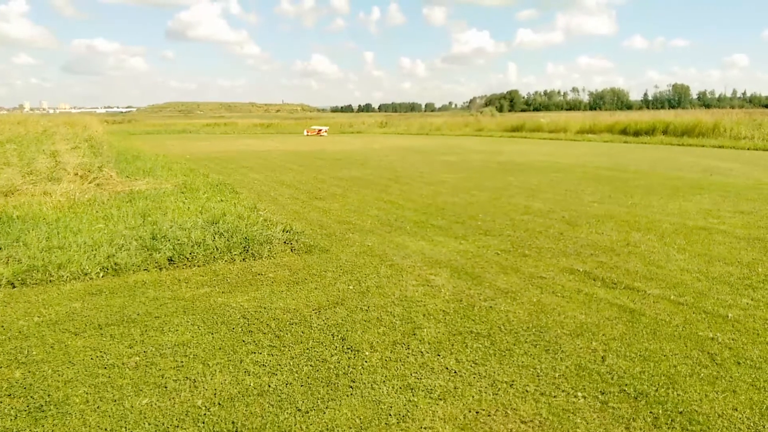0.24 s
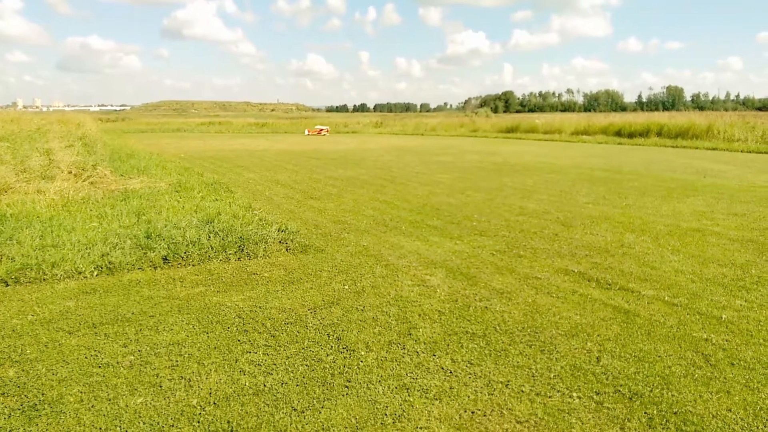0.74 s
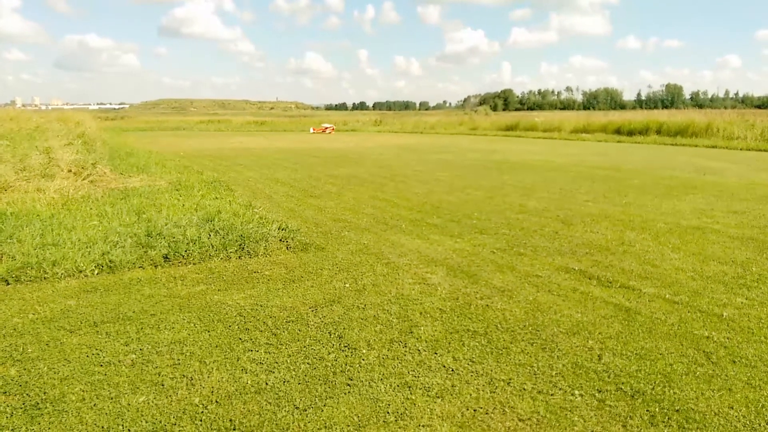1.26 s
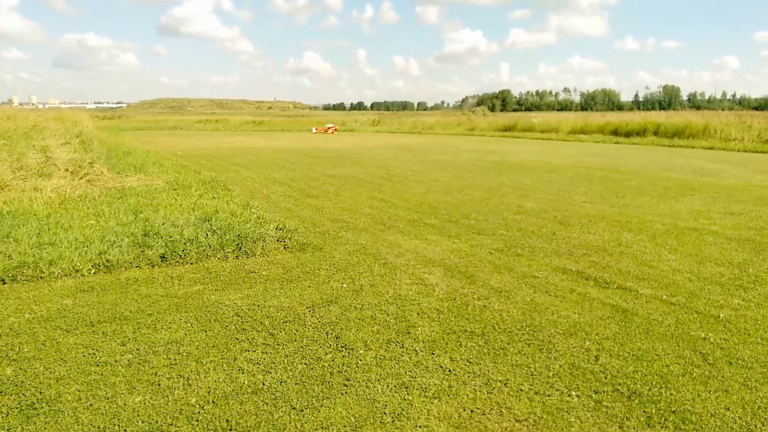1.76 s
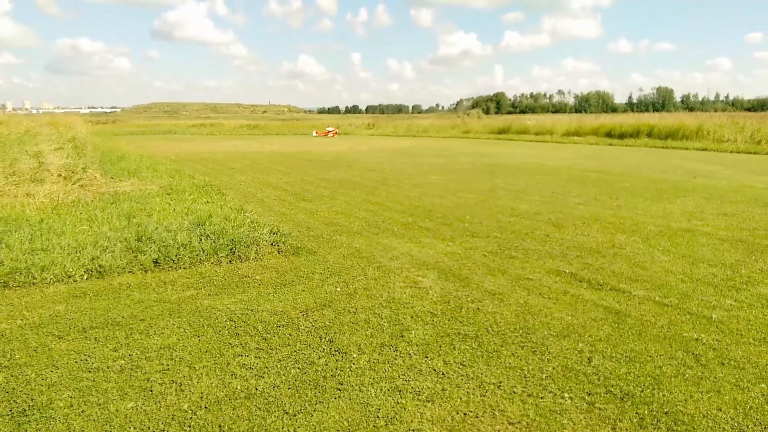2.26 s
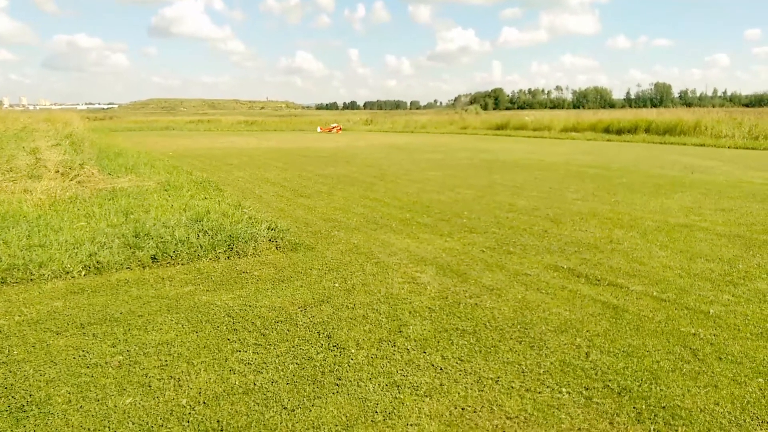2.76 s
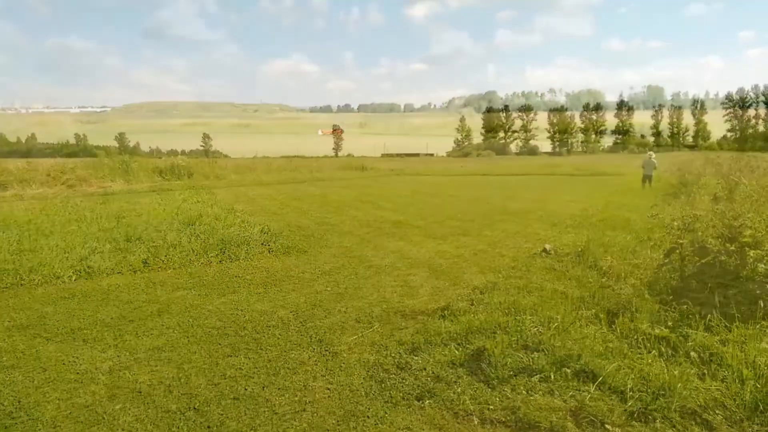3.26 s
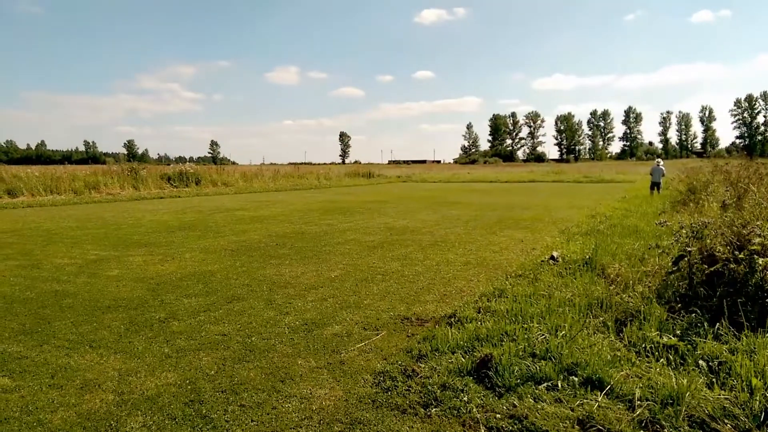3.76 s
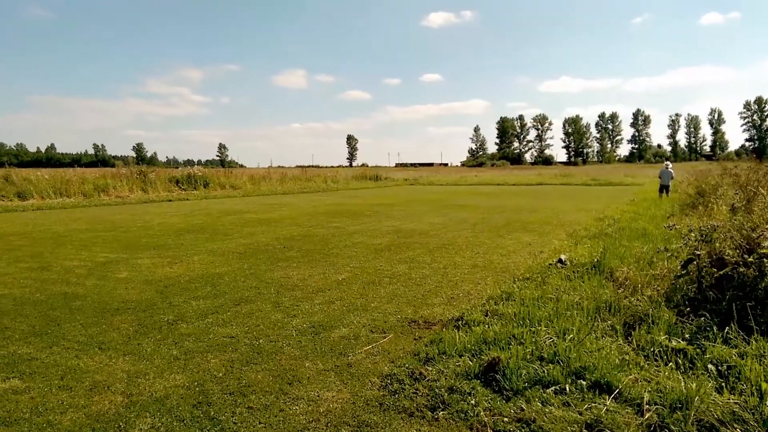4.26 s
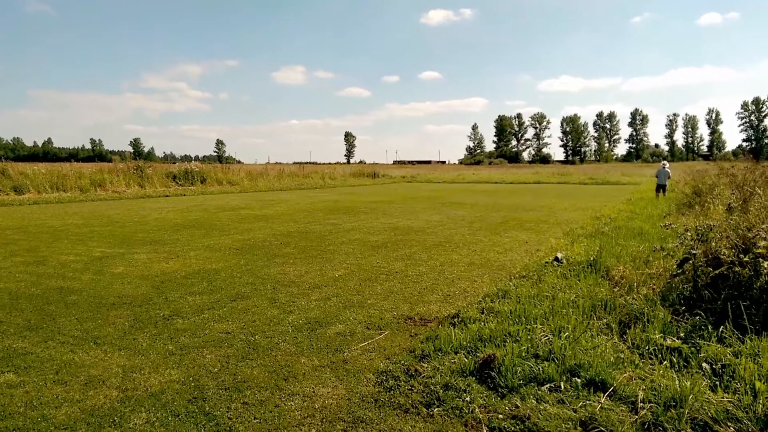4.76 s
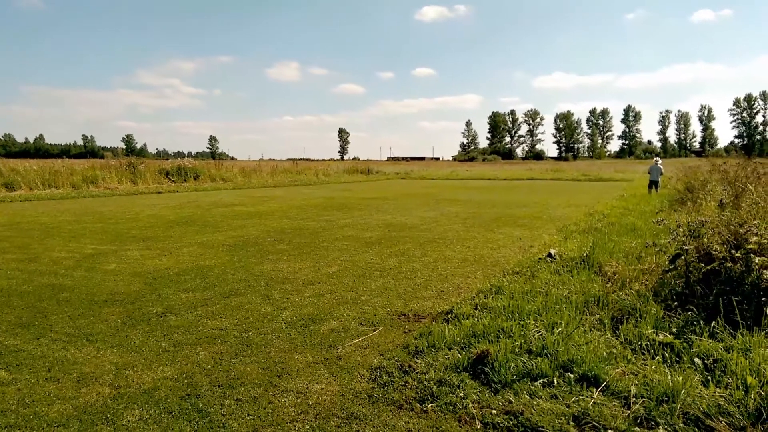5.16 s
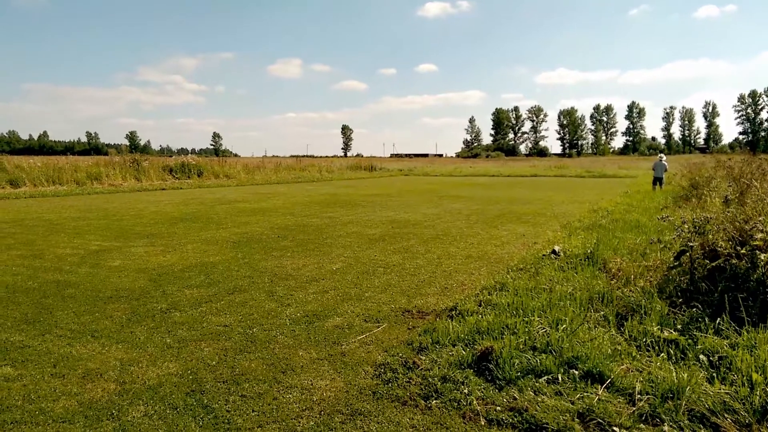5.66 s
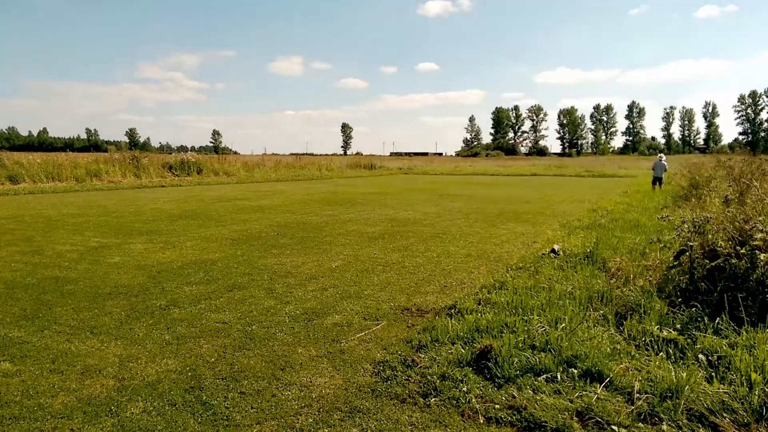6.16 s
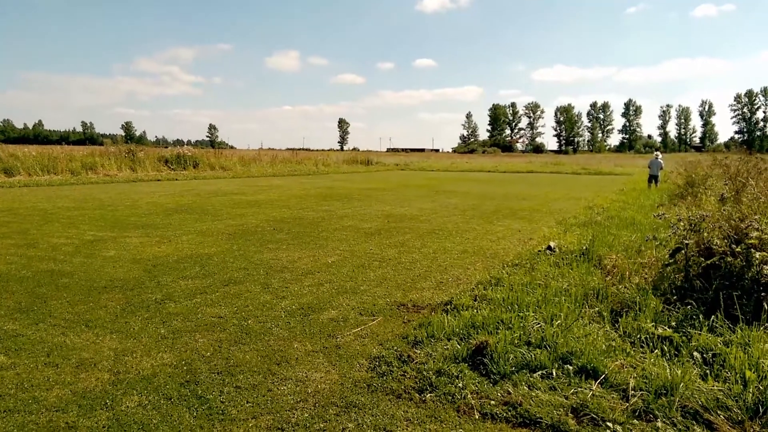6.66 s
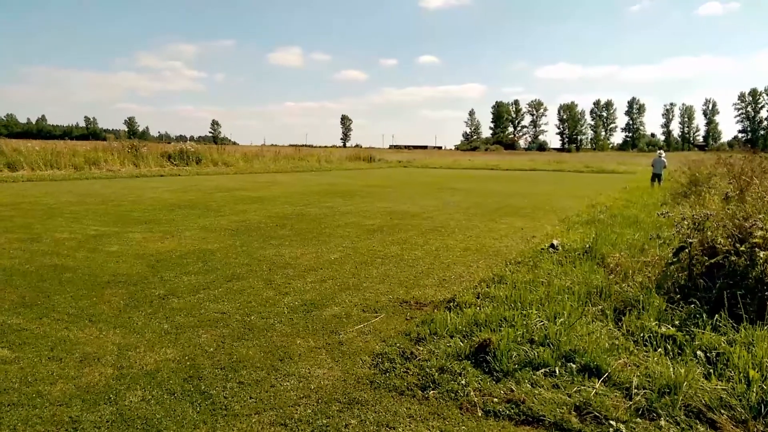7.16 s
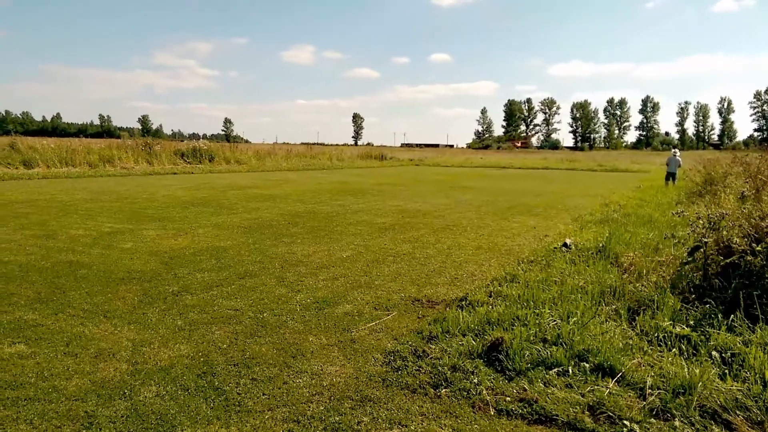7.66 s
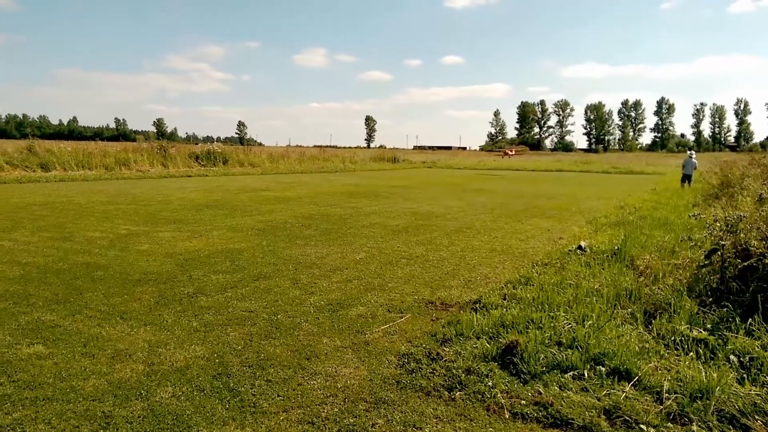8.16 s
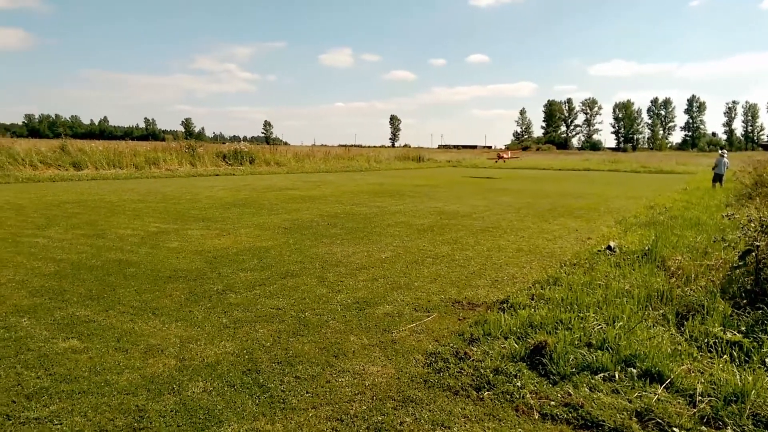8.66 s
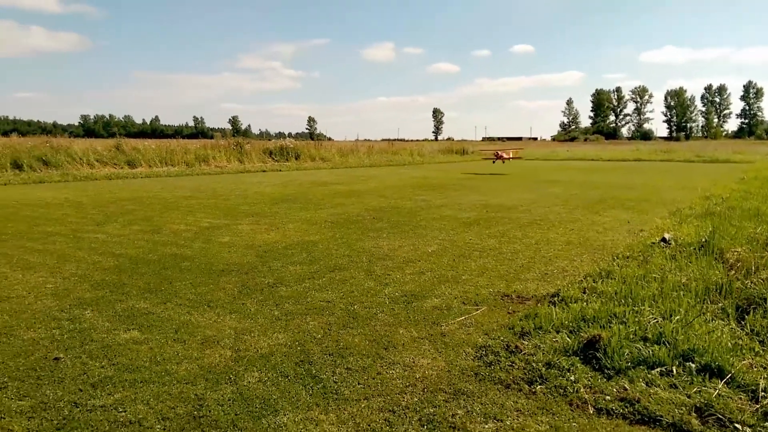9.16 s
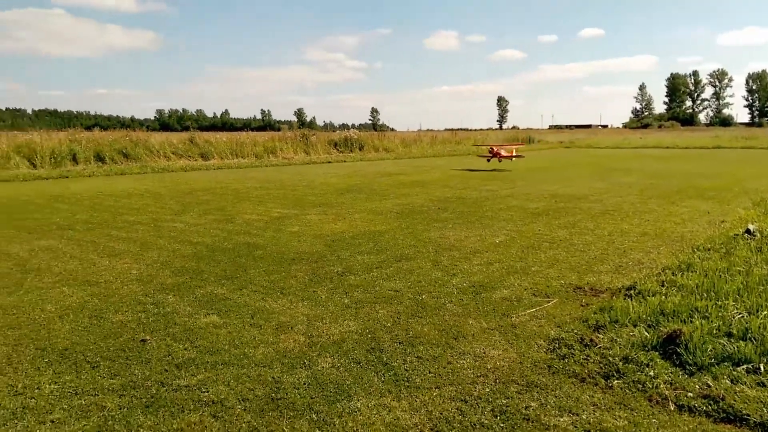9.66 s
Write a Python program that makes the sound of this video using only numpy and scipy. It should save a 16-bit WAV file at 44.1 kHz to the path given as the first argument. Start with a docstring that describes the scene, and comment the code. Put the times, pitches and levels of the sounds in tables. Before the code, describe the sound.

Outdoor stereo sound with wind buffeting at first, mostly on the right. A far engine lopes with low soft putts, faint metallic ticks and airy propeller hiss, slowly quickening. Around three seconds it crossfades to a nearer, brighter engine, revved in cracking bursts, with a brief hollow bark at the top revs. It falls back to irregular pops and thumps at low throttle, swelling steadily as it approaches. Insects rasp faintly in the grass.

```python
"""A model biplane's three-cylinder four-stroke engine on a grass airfield, in two views that dissolve.
Far off it taxis with a dull uneven throb while wind bumps the right microphone; then, closer, the throttle
is blipped with sharp cracks and the plane rolls nearer at a stumbling idle. Gas pulses ring exhaust modes;
shaped noise makes the gas, propeller hiss, wind, air and the insects in the grass; a bird chip is a falling sine."""
import sys
import numpy as np
from scipy import signal
from scipy.fft import rfft, irfft
from scipy.io import wavfile

SR = 44100
rng = np.random.default_rng(int(sys.argv[2]) if len(sys.argv) > 2 else 0)


def inscribe(sig):
    """Save sig as 16-bit PCM at rate SR to the path in sys.argv[1].

    A 1-D sig is mono; a 2-D sig holds one channel per row.
    Samples are clipped to [-1, 1] before scaling.
    """
    pcm = np.round(np.clip(np.atleast_2d(sig).T, -1, 1) * 32767)
    wavfile.write(sys.argv[1], SR, pcm.astype(np.int16))


N = 437472
T = np.arange(N) / SR


def amp(db):
    """Amplitude factor of a level in dB."""
    return 10 ** (np.asarray(db) / 20)


def unit(x):
    """Scales a sound to an RMS of 1."""
    return x / np.sqrt(np.mean(x ** 2) + 1e-20)


def curve(rows, axis=1):
    """One column of a table, joined by straight lines in time."""
    rows = np.asarray(rows)
    return np.interp(T, rows[:, 0], rows[:, axis])


def phase_of(hz):
    """Running phase in radians of a frequency that may vary."""
    return 2 * np.pi * np.cumsum(hz) / SR


def noise():
    """White noise of unit variance."""
    return rng.standard_normal(N)


def waver(hz):
    """Slow random drift of unit RMS: noise under a Gaussian low-pass."""
    lowpass = np.exp(-(np.fft.rfftfreq(N, 1 / SR) / hz) ** 2)
    return unit(irfft(rfft(noise()) * lowpass, N))


def colour(x, points):
    """Filters causally (minimum phase) to a spectrum given as f/Hz, level/dB."""
    hz, db = np.transpose(points)
    log_hz = np.log(abs(np.fft.fftfreq(4096, 1 / SR)) + 1)
    log_gain = np.log(amp(np.interp(log_hz, np.log(hz), db)))
    taps = np.fft.ifft(np.exp(np.conj(signal.hilbert(log_gain)))).real
    return signal.oaconvolve(x, taps)[:N]


def resonate(x, hz, width, phase=0):
    """A resonance of gain 1 whose frequency can follow a curve: shift to 0 Hz, smooth, shift back."""
    turn = np.exp(1j * phase_of(hz * np.ones(N)))
    r = np.exp(-np.pi * width / SR)
    smooth = signal.lfilter([1 - r], [1, -r], x / turn + 1e-18)
    return 2 * (np.exp(1j * phase) * turn * smooth).real


def clicks(s, db):
    """Impulses at the given times and levels."""
    place = np.clip(np.round(s * SR).astype(int), 0, N - 1)
    return np.bincount(place, amp(db), N)


def fade(x, seconds):
    """Gives each impulse an exponential tail."""
    return signal.lfilter([1], [1, -np.exp(-1 / (SR * seconds))], x + 1e-18)


def pan(x, lean_db):
    """Sets the level difference of the two microphones at constant power; positive leans left."""
    ports = np.array([x * amp(lean_db / 2), x * amp(-lean_db / 2)])
    return ports / np.cosh(lean_db * np.log(10) / 40)


# spectra of the open-field background at the left and right microphones: f/Hz, level/dB
AIR_LEFT = [(60, -44), (250, 13.5), (500, 16.5), (1000, 15.5), (2000, 0.5), (4000, 13), (7000, 0.5),
            (10000, -32), (16000, 3)]
AIR_RIGHT = [(60, -9), (250, -11), (500, -1.5), (1000, -4.5), (2000, -7), (4500, -32), (7000, -13),
             (9000, -7.5), (11000, -1.5), (16000, -6.5)]


def air():
    """Faint open-field wash and microphone hiss: steady noise, with more of the top on the right."""
    left = amp(-63.5) * unit(colour(noise(), AIR_LEFT))
    right = amp(-55.5) * unit(colour(noise(), AIR_RIGHT))
    return np.array([left, right])


# wind rumble over time, before a common trim: t/s, level/dB
WIND = [(0, -34.5), (.15, -41), (.8, -45), (2.9, -42), (4.2, -56), (6, -52.5), (6.5, -54.5), (8.8, -52.5),
        (9.92, -47.5)]
# its lean between the microphones: t/s, left minus right level/dB
WIND_LEAN = [(0, -9.5), (1.5, -4.5), (3, -6.5), (4, -2.5), (9.9, -1)]
# its spectrum: f/Hz, level/dB
RUMBLE = [(15, -19), (35, -4), (55, 2), (90, -5), (150, -3), (300, -12), (700, -37), (2000, -88)]
# gusts that bump the right microphone: t/s, level/dB, decay/s, upper edge f/Hz
BUMPS = [(0.003, -25.5, 0.016, 267), (0.036, -33.5, 0.015, 225), (.236, -31.5, 0.013, 150),
         (0.286, -25.5, 0.016, 190), (0.3, -30, 0.0074, 270), (0.575, -34, 0.02, 150),
         (0.612, -40, 0.011, 192), (0.76, -43.5, 0.059, 123), (1.238, -47, 0.23, 128),
         (1.9747, -26.5, 0.0012, 750), (1.98, -23, 0.011, 165), (2.024, -35.5, 0.022, 323),
         (2.079, -28, 0.0071, 187), (2.77, -42.5, 0.086, 120)]


def wind():
    """Lumpy rumble, partly shared by both microphones, and sudden bumps: a push of air, then eddies."""
    shared = noise()
    rumble = np.array([unit(colour(shared + 0.5 * noise(), RUMBLE)) for _ in range(2)])
    lumps_db = 2 * np.tanh(waver(hz=3.1))
    rumble *= pan(amp(curve(WIND) - 4.5 + lumps_db), lean_db=curve(WIND_LEAN))
    bumps = np.zeros(N)
    age = T[:SR // 3]
    for s, db, decay, edge_hz in BUMPS:
        shape = np.exp(-age / decay)
        push = signal.unit_impulse(len(age)) * np.sqrt(SR * decay / 2)
        eddies = shape * rng.standard_normal(len(age))
        band = signal.butter(4, [45, edge_hz], "band", fs=SR, output="sos")
        puff = signal.sosfilt(band, eddies - push)
        start = max(round(s * SR), 0)
        bumps[start:start + len(age)] += amp(db) * puff * np.linalg.norm(shape) / np.linalg.norm(puff)
    return rumble + pan(bumps, lean_db=-37)


def wingbeat(rate, depth_db, double_db):
    """The pulsing of an insect's rasp, one stroke per cycle."""
    angle = phase_of(rate)
    return unit(amp(depth_db * np.cos(angle) + double_db * np.cos(2 * angle)))


# spectrum of the endless bush-cricket trill: f/Hz, level/dB
TRILL = [(7000, -23), (10000, -21), (11500, 0), (13500, 10.5), (16000, 8)]
# its mean pace: t/s, pulse rate f/Hz
TRILL_RATE = [(3, 94.5), (3.5, 101.5)]
# pulsed bands in the field: the first, near 8.5 kHz, is the distant engine's hiss as that view fades; # the
# rest are grasshopper phrases: start t/s, end t/s, f/Hz, level/dB, pulse rate f/Hz
SONGS = [(3.104, 3.81, 8500, -62.5, 50), (4.3, 5.597, 8880, -58.5, 44), (5.608, 7.12, 7800, -58, 60),
         (5.61, 7.115, 9200, -64.5, 53.5), (7.54, 9.057, 7700, -54.5, 52.3), (8.85, 10.1, 9500, -53, 60)]
SONG_SAG, SONG_SAG_S = 0.12, 0.1  # share by which the pulses slow as a phrase ends, time constant/s


def insects():
    """Grasshoppers rasp pulsed noise in phrases under the high pulsed trill of bush-crickets; the first pulsed
    band, near 8.5 kHz, is the distant engine's hiss fading with its view."""
    trill = wingbeat(curve(TRILL_RATE) * (1 + 0.0083 * waver(hz=4.3)), depth_db=2.0, double_db=1.0)
    trill_db = (-65, -46)  # left, right
    out = np.array([amp(db) * unit(colour(trill * noise(), TRILL)) for db in trill_db])
    for start, end, hz, db, rate in SONGS:
        sag = SONG_SAG * np.exp(np.minimum(T - end, 0) / SONG_SAG_S)
        strokes = wingbeat(rate * (1 - sag), depth_db=6.5, double_db=1.0)
        # slow swell, abrupt stop
        phrase = np.clip(np.minimum((T - start) / 0.63, (end - T) / 0.014) + .5, 0, 1)
        band = [(.5 * hz, -40), (0.89 * hz, -15), (1.01 * hz, 0),
                (1.018 * hz, 0), (1.126 * hz, -13), (2 * hz, -35)]
        out += amp(db) * phrase * [unit(colour(strokes * noise(), band)) for _ in range(2)]
    return out


# a short bird chip: t/s, length/s, start f/Hz, end f/Hz, level/dB
CHIP = (3.047, .02, 3450, 3080, -52)


def bird():
    """One quick chip on the right: a falling sine under a smooth hump."""
    s, length, start_hz, end_hz, db = CHIP
    along = np.clip((T - s) / length, 0, 1)
    tone = np.sin(phase_of(start_hz + (end_hz - start_hz) * along))
    return pan(amp(db) * np.sin(np.pi * along) ** 2 * tone, lean_db=-14)


def swish(speed, turn_db, blade_db, firing_db):
    """Rise and fall of the hiss; the shaft turns twice for three firings."""
    firing = phase_of(curve(speed))
    angle = firing * 2 / 3
    return unit(amp(turn_db * np.cos(angle) + blade_db * np.cos(2 * angle) + firing_db * np.cos(firing)))


# speed of the distant engine: t/s, firing rate f/Hz
FAR_SPEED = [(0, 44), (.3, 45.7), (.55, 50), (.75, 59), (.95, 60.5), (1.2, 67.3), (1.55, 70.5), (1.85, 76),
             (2.15, 76.3), (2.5, 80.6), (3.15, 80), (3.6, 77)]
# speed of the approaching engine, blipped and then idling: t/s, firing rate f/Hz
NEAR_SPEED = [(2.8, 88), (3.15, 93), (3.42, 117), (3.8, 103), (4.2, 69), (4.45, 82), (4.59, 109),
              (4.72, 101), (4.85, 88), (4.98, 102), (5.09, 92), (5.21, 98), (5.45, 80), (5.87, 68),
              (6.1, 106), (6.27, 141), (6.6, 86), (7.0, 59), (7.5, 54.5), (9.92, 52.5)]
# propeller hiss before each microphone's trim: t/s, level/dB
HISS = [(0, -64.5), (.9, -56), (1.3, -51), (1.9, -50), (3.3, -55.5), (4.36, -60), (4.9, -54.5), (7.05, -56),
        (7.15, -56), (7.8, -51.5), (9.3, -46), (9.92, -46.5)]
# its spectrum far off and close by: f/Hz, level/dB
HISS_FAR = [(500, -39), (1600, 1.5), (2500, -6.5), (3100, 4.5), (3700, 3.5), (4500, -4), (5200, 3),
            (6500, -2.5), (8300, 12), (10000, 3.5), (11500, 9), (13000, -4), (16000, 7)]
HISS_NEAR = [(500, -24.5), (2700, 9), (3900, -6), (4800, -2.5), (5600, -4), (7000, -5), (7800, 3),
             (9200, -1), (11000, -10.5), (16000, 2)]


def propeller():
    """Noise hiss that pulses with the shaft, its two blades and the firings."""
    far_share = np.interp(T, [2.8, 3.7], [1, 0])  # the dissolve
    far_swish = swish(FAR_SPEED, turn_db=0.1, blade_db=1.5, firing_db=1.5)
    near_swish = swish(NEAR_SPEED, turn_db=1.5, blade_db=0.8, firing_db=0.6)
    out = np.zeros((2, N))
    for port in out:
        port += np.sqrt(far_share) * unit(colour(far_swish * noise(), HISS_FAR))
        port += np.sqrt(1 - far_share) * unit(colour(near_swish * noise(), HISS_NEAR))
    return out * amp(curve(HISS)) * amp([[2], [2.5]])


def firings(speed, hard_s):
    """All firing times in step with the hard ones, and each one's count since the last hard one."""
    count = np.cumsum(curve(speed)) / SR
    at = np.interp(hard_s, T, count)
    steps = np.maximum(np.round(np.diff(at)), 1)
    number = np.r_[0, np.cumsum(steps)].astype(int)
    every = np.arange(-90, number[-1] + 30)
    # bend the even count so that whole numbers fall on the hard firings
    s = np.interp(every + np.interp(every, number, at - number), count, T)
    last_hard = np.maximum(np.searchsorted(number, every, "right") - 1, 0)
    since = every - number[last_hard]
    heard = (s > 0) & (s < T[-1])
    return s[heard], since[heard]


# the sharpest ticks from the engine: t/s, relative level/dB
TICKS = [(1.0932, -34), (1.314, -41), (1.4445, -37), (1.937, -42), (9.0352, -34), (9.6076, -29),
         (9.628, -38), (9.781, -35), (9.894, -36)]


def ticks():
    """A light metallic tick on each turn of the distant shaft, and a few sharp ones: ringing noise."""
    shaft = [(s, rate * 2 / 3) for s, rate in FAR_SPEED]
    s, _ = firings(shaft, [tick[0] for tick in TICKS])
    s = s[s < 2.8]
    light = clicks(s, np.interp(s, T, curve(HISS)) + 20 + 3 * noise()[:len(s)])
    strikes = fade(light + amp(9.5) * clicks(*np.transpose(TICKS)), seconds=0.0013)
    ports = []
    for _ in range(2):
        rattle = strikes * noise()
        main_mode = resonate(resonate(rattle, hz=11500, width=1500), hz=11350, width=1900)
        ports.append(main_mode + 0.8 * resonate(rattle, hz=8300, width=520))
    return amp([[-2], [2]]) * ports


# spectrum of a gas pulse, shaping the exhaust's ring: f/Hz, level/dB
PULSE = [(25, 3.5), (80, -10.5), (140, 6.5), (240, 7.5), (300, -6.5), (380, -14.5), (520, 4.5), (750, -29),
         (1500, 9.5), (5000, 19)]


def exhaust(s, db, ring_hz, width_hz):
    """Each gas pulse rings the two lowest modes of the exhaust; they beat, so a putt dies quickly."""
    pulses = clicks(s, db) * SR / (2 * np.pi)
    main_mode = resonate(pulses, ring_hz, width_hz, phase=-np.pi / 2) / width_hz
    second_mode = resonate(pulses, 1.3 * ring_hz, 5.5 * width_hz, phase=-np.pi / 2) / (4.9 * width_hz)
    return colour(main_mode - 0.11 * second_mode, PULSE)


# running level of the distant exhaust up to the dissolve: t/s, relative level/dB
FAR_LEVEL = [(0, -45), (.5, -46.5), (1.0, -44), (1.8, -45), (2.5, -39.5), (3.1, -39.5), (3.45, -47.5),
             (3.9, -64)]
# one cylinder catches only on every second cycle, so six firings make one lope:
# level/dB of each at full depth, from the hard one on
LOPE = [10, 2.5, 6.5, -33, 3.5, 6.5]
# how deep the lope is as the engine clears: firing rate f/Hz, share
LOPE_DEPTH = [(45, 0.6), (60, 0.68), (73, 1), (80, 0.4)]
# hard putts from which the lope starts afresh: t/s
FAR_PUTTS = [.137, 0.5082, 0.7345, 1.0315, 1.2567, 1.5188, 1.8467, 2.4806, 2.7782, 3.2809, 3.509]
FAR_STAGGER_S = 0.00012  # each firing comes a little early or late


def lope(scatter_db):
    """Times and levels of the distant engine's firings: a six-firing pattern with chance scatter."""
    s, since = firings(FAR_SPEED, FAR_PUTTS)
    rate = np.interp(s, T, curve(FAR_SPEED))
    depth = np.interp(rate, *np.transpose(LOPE_DEPTH))
    uneven_db = depth * np.take(LOPE, since % len(LOPE)) + scatter_db * noise()[:len(s)]
    return s + FAR_STAGGER_S * noise()[:len(s)], np.interp(s, T, curve(FAR_LEVEL)) + uneven_db


def far_engine():
    """Over a long stretch of grass mostly the low throb survives; it reaches the left microphone first."""
    s, db = lope(scatter_db=1.66)
    throb = amp(3.0) * exhaust(s, db, ring_hz=244.0, width_hz=55.7)
    left, right = pan(throb, lean_db=-3.5)
    return np.array([left, np.interp(T - .00034, T, right)])


# the three cylinders under throttle, the sharp one first: thump level/dB, crack level/dB, lateness t/s
CYLINDERS = [(-0.5, 4, 0.00042), (7, 0, 0.00058), (-9, 3, 0.0021)]
# the loudest exhaust pops and putts, relative to the running level: t/s, thump level/dB, crack level/dB
POPS = [(3.265, -4, 8.5), (3.297, -1, 6.1), (3.326, 16, 4.6), (3.35, 6, 6.5), (3.379, 3, 6.5),
        (3.405, 5, 6.8), (3.431, 0, 6.5), (3.456, 0, 6), (3.4818, 8, 9.7), (3.536, 1, 8.6),
        (3.561, 18, 8.9), (3.588, 2.5, 11), (3.64, 23, 8.7), (3.697, 2, 9.6), (3.725, 2, 9.5),
        (3.754, -2, 6.9), (3.7823, 2, 11), (3.842, 0, 11.2), (3.9368, 11, 11.7), (4.285, 9.5, 7.4),
        (4.3628, 9, 7.3), (4.476, 8, 9.4), (4.51, -3, 5.3), (4.5429, 4.4, 6.4), (4.573, 1, 3.6),
        (4.6003, 7, 5.7), (4.6566, 17.5, 12.4), (4.714, 16, 14.4), (4.776, 14, 15.5), (4.874, 14, 12),
        (4.907, 8, 11.3), (4.969, 10, 10), (4.999, 13, 7.9), (5.093, 11, 13), (5.1265, 7.6, 11.3),
        (5.158, -1, 12), (5.22, 4, 12), (5.3147, 11, 11), (5.6088, 6, 10.4), (5.902, 6, 11.8),
        (5.94, -3, 5.5), (5.976, 4, 10.8), (6.008, -3, 9.6), (6.038, -3, 8.3), (6.07, 6, 9.6),
        (6.099, 7, 9.3), (6.136, 12, 9.3), (6.153, 8, 8.6), (6.178, 8, 7.5), (6.201, 6, 8.3),
        (6.224, 3, 6.4), (6.247, -1, 4.1), (6.269, 3, 1.9), (6.2891, -1, 4.2), (6.489, 15, 7.3),
        (6.555, 12, 3.4), (6.6005, 17.5, 11.2), (6.627, 9, 5.8), (6.6742, 13.5, 10), (6.738, 8, 2.5),
        (6.835, 7.5, 2.1), (6.913, 8, 2.66), (6.97, 5, 2), (7.0269, 7, 8.1), (7.061, 3.5, 2.5),
        (7.183, 6, 11), (7.218, 6.5, 3.8), (7.327, 3, 2), (7.342, 8, 10.7), (7.429, 3, 3.5), (7.538, 4, 1),
        (7.5554, 4, 8.5), (7.647, 5.5, 4.6), (7.664, 1, 2.5), (7.719, 4, 3), (7.755, 5.5, 2.5),
        (7.828, 4, 1), (7.866, 5.5, 3.4), (7.941, 6.5, 7.8), (7.976, 5.5, 6), (8.087, 5, 3),
        (8.156, 7, 13.7), (8.194, 4, 8.8), (8.302, 4.5, 7.3), (8.319, 4.5, 11.4), (8.334, 7, 4.5),
        (8.406, 3.5, 7.6), (8.4761, 7.5, 11), (8.568, 3.5, 4.4), (8.644, 6, 11), (8.682, 5.5, 3.4),
        (8.795, 3.5, 3), (8.815, 6.5, 9.7), (8.906, 4.5, 3.3), (8.944, 3, 4.4), (8.963, 5, 6.1),
        (9.034, 7, 13.4), (9.071, 5.5, 5), (9.132, 6.5, 4.1), (9.169, 1, 3), (9.206, 7.5, 11.4),
        (9.301, 7.5, 7), (9.338, 4.5, 6.5), (9.3747, 7.5, 8.9), (9.415, 5.5, 3), (9.491, 4, 3),
        (9.53, 4.5, 2.5), (9.606, 5.5, 8.8), (9.628, 3, 8.8), (9.648, 6, 4.5), (9.722, 1.5, 4),
        (9.759, 2, 1), (9.781, 4, 10.2), (9.819, 4.5, 10), (9.858, 1, 4), (9.8946, 3, 11.3)]
# pairs of thump dB, crack dB: at idle every second firing is the firmer one
FIRM_DB, WEAK_DB = np.array([[-1.5], [.5]]), np.array([[-3.5], [-1.5]])
# chance differences between firings
SCATTER_IDLE_DB, SCATTER_OPEN_DB = np.array([[3.2], [3.5]]), np.array([[2], [3]])
STAGGER_S = 0.001055  # ordinary firings come a little early or late at idle


def stumble():
    """Near firing times, extra thump and crack: by cylinder under throttle, firm and weak in turn at idle."""
    s, since = firings(NEAR_SPEED, [pop[0] for pop in POPS])
    rate = np.interp(s, T, curve(NEAR_SPEED))
    firm = np.clip((rate - 65) / 25, 0, 1)
    idle = np.where(since % 2 == 0, FIRM_DB, WEAK_DB)
    uneven = np.interp(rate, [112, 135], [1, .6])  # the cylinders even out at top revs
    cylinder = np.transpose(CYLINDERS)[:, since % len(CYLINDERS)]
    extra = firm * uneven * cylinder[:2] + (1 - firm) * idle
    spread_db = firm * SCATTER_OPEN_DB + (1 - firm) * SCATTER_IDLE_DB
    extra += spread_db * np.tanh([noise()[:len(s)] for _ in range(2)])
    extra[:, since == 0] = np.transpose(POPS)[1:]
    late = firm * uneven * cylinder[2]
    stagger = STAGGER_S * (1 - firm) * (since > 0) * noise()[:len(s)]
    return s + late + stagger, extra


# base level at the cruise rate, fading in and rolling closer: t/s, thump level/dB, crack level/dB
APPROACH = [(2.8, -85, -68), (3.0, -77, -58), (3.3, -56, -52), (3.7, -55, -42.5), (4.5, -59.5, -53),
            (5.4, -53, -45.5), (6.0, -53.5, -53), (6.2, -57, -52.5), (6.35, -51, -40), (6.65, -54.5, -41.5),
            (7.1, -48.5, -46.5), (7.9, -46.5, -47.5), (8.7, -42, -48), (9.3, -39, -45.5),
            (9.92, -31.5, -46.5)]
CRUISE_RATE, FULL_RATE = 70, 78.8  # firings per s; above the full rate, speed itself adds no level
THUMP_DB_PER_RATE, CRACK_DB_PER_RATE = 0.3929, 0.181  # for each extra firing per s
THUMP_DB_PER_PULL, CRACK_DB_PER_PULL = 0.036, 0.0618  # for acceleration in firings per s per s
PULL_LAG_S = 0.08  # the load follows the acceleration with this lag


def effort(rate):
    """Running level of thump and crack, set by speed, by acceleration and by the approach."""
    pull = fade(np.gradient(rate), seconds=PULL_LAG_S) / PULL_LAG_S
    faster = np.minimum(rate, FULL_RATE) - CRUISE_RATE
    thump_db = curve(APPROACH) + THUMP_DB_PER_RATE * faster + THUMP_DB_PER_PULL * pull
    crack_db = curve(APPROACH, axis=2) + CRACK_DB_PER_RATE * faster + CRACK_DB_PER_PULL * pull
    return thump_db, crack_db


# spectrum of the clean drone under throttle: f/Hz, level/dB
DRONE = [(60, -9), (100, -9.5), (140, -40), (200, -2), (295, -1.5), (350, -25), (420, -14.5), (520, -13),
         (610, -18.5), (700, -23), (1000, -13.5)]


def drone(rate, db):
    """Pulses merge into clean orders; unequal cylinders add thirds, and higher up the shaft's orders lead."""
    cycles = np.cumsum(rate / 3) / SR
    hz, colour_db = np.transpose(DRONE)
    out = np.zeros(N)
    for order in range(2, 30):
        line_hz = order * rate / 3
        between = order % 3 > 0  # not a multiple of the firing rate
        weaker_db = np.interp(order, [9, 10], [-13 * between, -9 * (order % 2)])
        line_db = np.interp(line_hz, hz, colour_db) + weaker_db
        out += amp(line_db) * np.cos(2 * np.pi * (order * cycles + rng.random()))
    return amp(db) * out


# modes of the pipe that each firing strikes, tuned at idle:
# f/Hz, width f/Hz, idle level/dB, open-throttle level/dB, extra dB per dB of hardness
POP_MODES = [(1120, 140, -10, -30, 0), (1540, 160, -16.5, -15, .8), (2040, 160, -15, -3, .1),
             (2560, 130, -9, -17, .7), (3040, 160, -34, -21, .5)]


def pops(s, db, hardness_db, heat, throttle):
    """Each firing strikes the pipe's modes, and a hard one sounds brighter."""
    out = np.zeros(N)
    flutter = 1 + 0.015 * waver(hz=15)
    opened = np.interp(s, T, throttle)
    for hz, width, idle_db, open_db, brighten in POP_MODES:
        mode_db = idle_db + (open_db - idle_db) * opened
        strikes = clicks(s, db + mode_db + (1 + brighten) * hardness_db)
        out += resonate(strikes, hz * heat * flutter, width) * SR / (2 * np.pi * width)
    out = signal.sosfilt(signal.butter(2, 900, "high", fs=SR, output="sos"), out)
    return signal.sosfilt(signal.butter(10, 3450, fs=SR, output="sos"), out)


# at top revs the exhaust barks once in each cycle: t/s, relative level/dB
BARKS = [(6.164, -41), (6.187, -34), (6.21, -35), (6.234, -37), (6.255, -36.5), (6.279, -45)]
# what a bark rings with: f/Hz, width f/Hz, level/dB
BARK_MODES = [(827, 50, -4.5), (926, 88, 2.5), (1020, 49, -1.5), (3290, 74, -5.5)]


def barks():
    """A hollow exhaust ring; neighbouring modes start in opposition, so each bark swells briefly."""
    blows = clicks(*np.transpose(BARKS)) * SR / (2 * np.pi)
    out = np.zeros(N)
    for k, (hz, width, db) in enumerate(BARK_MODES):
        out += (-1) ** k * amp(db) * resonate(blows, hz, width, phase=-np.pi / 2) / width
    return out


def blast(blows):
    """A dry rasp of gas that swells and dies within a few milliseconds of each firing."""
    decay_s = .0013
    swell = fade(fade(blows, seconds=decay_s), seconds=decay_s) * np.e / (SR * decay_s)
    band = signal.butter(7, (1200, 3050), "band", fs=SR, output="sos")
    return amp(4.5) * signal.sosfilt(band, swell * np.tanh(noise()))


def scatter(x, seconds):
    """Grass and bushes return a short diffuse tail, different at each microphone."""
    t = T[:SR // 8]
    tails = rng.standard_normal((2, len(t))) * np.exp(-t / seconds) * (t > .002)
    return signal.oaconvolve(x[None], tails / np.linalg.norm(tails[0]), axes=1)[:, :N]


# pipe overtones at idle and their change at full throttle:
# f/Hz, width f/Hz, level/dB, rise in f as a share, extra level/dB
PIPE = [(1162, 85, 0.5, 0.11, -0.5), (1638, 108, -1, 0.018, 4.5), (1994, 135, 4, 0.066, 5.5),
        (2466, 110, 1, 0.12, -4), (2850, 95, -21, 0.027, -7), (4680, 290, -26, .01, 12.5)]
# what the muffler lets through of the overtones: f/Hz, level/dB
MUFFLER = [(300, -14.5), (800, 4.5), (1200, 2.5), (2400, 2), (3350, -19), (3800, -17.5), (4700, 3),
           (6000, -16.5), (12000, -4)]


def overtones(gas, throttle):
    """Turbulent gas rings the pipe's overtones, which rise with the throttle, through the muffler."""
    wander = 1 + .015 * waver(hz=5.6)  # the gas is never evenly hot
    out = np.zeros(N)
    for hz, width, db, rise, open_db in PIPE:
        ring = resonate(gas, hz * wander * (1 + rise * throttle), width)
        out += amp(db + open_db * throttle) * ring
    return colour(out, MUFFLER)


# broad spectrum of the crack: f/Hz, level/dB
CRACK = [(200, -58), (500, 1), (900, -3.5), (1400, -0.5), (2400, 4), (3200, -26), (3800, -14), (4800, -8),
         (6500, -5), (9000, -26), (15000, -16)]
# tone at the firing rate, which lingers as the last blip runs down: t/s, level/dB
LOW_ORDER = [(5.8, -80), (6.1, -61), (6.22, -46), (6.45, -54.5), (6.7, -59), (7.1, -75)]
THUMP_OPEN_DB = -15  # change of the thump at full throttle
RING_OPEN_DB = -6.5  # at full throttle the breathy ring gives way to dry strokes


def near_engine():
    """Thumps, and with each a burst of turbulent gas that rings the pipe's overtones."""
    s, (thump_db, crack_db) = stumble()
    rate = curve(NEAR_SPEED)
    throb_db, running_db = effort(rate)
    throttle = np.clip((rate - 55) / 55, 0, 1)
    heat = 1 + 0.056 * throttle  # hotter gas raises the exhaust and struck modes

    thump_base_db = np.interp(s, T, throb_db + 6.0 + THUMP_OPEN_DB * throttle)
    thump = exhaust(s, thump_base_db + thump_db, 238 * heat, width_hz=47.0)
    hum = drone(rate, running_db - 8 + np.interp(rate, [56, 95], [-18, 1]))
    hum += amp(curve(LOW_ORDER)) * np.cos(phase_of(rate))

    firing_db = np.interp(s, T, running_db)
    blows = clicks(s, firing_db + 1.15 * crack_db)
    burst = fade(fade(blows, seconds=.0024), seconds=.0003) / (SR * .0003)
    # gas and clatter between the firings; under throttle the pops stand further out of it
    flow = amp(running_db - 5.3 - 8 * throttle)
    burst_gain = np.interp(throttle, [0, 1], [1.3, .75])
    gas = burst_gain * burst * np.tanh(noise()) + flow * noise()

    pipe = overtones(gas, throttle)
    struck = pops(s, firing_db, crack_db, heat, throttle)
    crack = amp(12.0 + RING_OPEN_DB * throttle) * pipe + struck + amp(-1.0) * colour(gas, CRACK) + barks()
    crack *= amp(np.interp(T, [8, 9.6], [0, -2.5]))  # the ring gives way to rasp
    clatter = np.array([colour(flow * noise(), CRACK) for _ in range(2)])
    scattered = clatter + amp(-5.5) * scatter(crack, seconds=0.017)
    rasp = resonate(resonate(gas, hz=2270, width=1570), hz=2290, width=1900)
    rasp *= np.interp(T, [7.5, 9.3], [0, 1.4])  # grows as the plane nears

    low = pan(thump + hum, lean_db=-3.0)
    sharp = pan(crack + throttle * blast(blows) + amp(7.5) * rasp, lean_db=-4.0)
    return low + sharp + amp([[-1], [-4]]) * scattered


def scene():
    """The airfield from its background to the engine."""
    background = air() + wind() + insects() + bird()
    return background + propeller() + ticks() + far_engine() + near_engine()


def record(dry):
    """The recorder's band limit: a linear-phase low-pass."""
    edge_hz = 15950
    lowpass = signal.firwin(601, edge_hz, window=("kaiser", 9), fs=SR)
    return signal.oaconvolve(dry, lowpass[None], "same")


dry = scene()
out = record(dry)
inscribe(out)
```